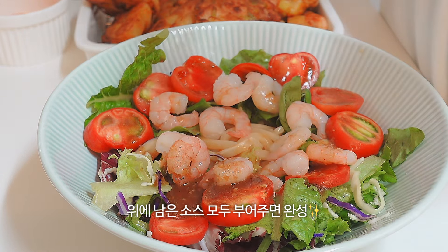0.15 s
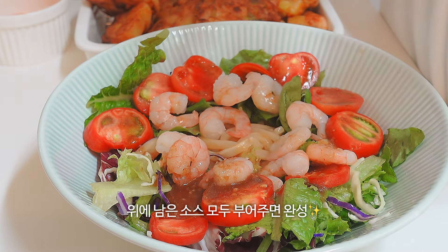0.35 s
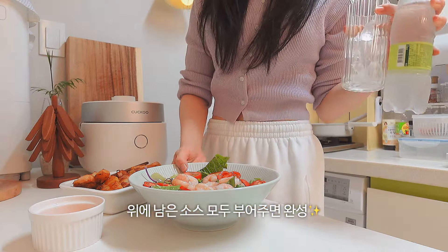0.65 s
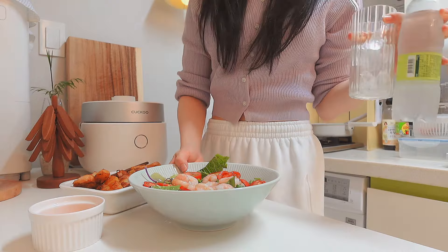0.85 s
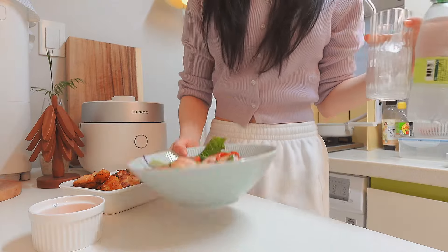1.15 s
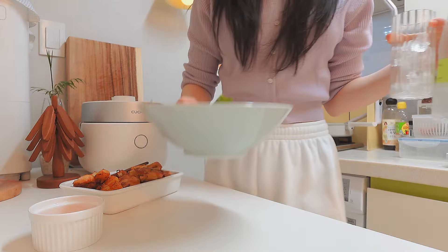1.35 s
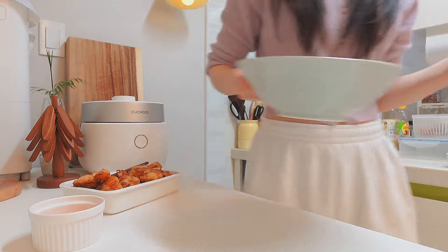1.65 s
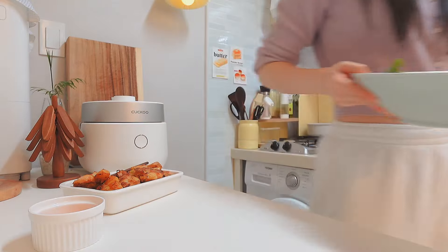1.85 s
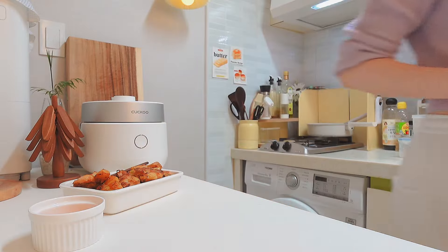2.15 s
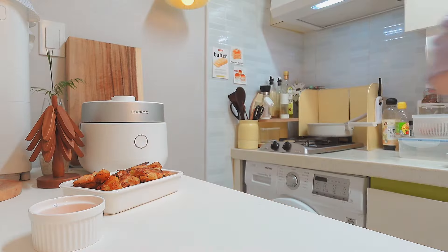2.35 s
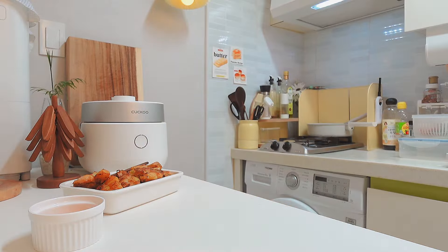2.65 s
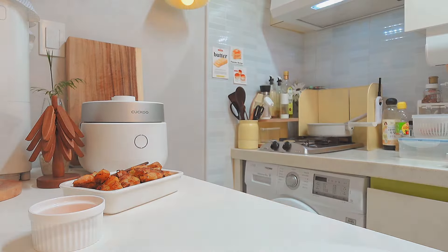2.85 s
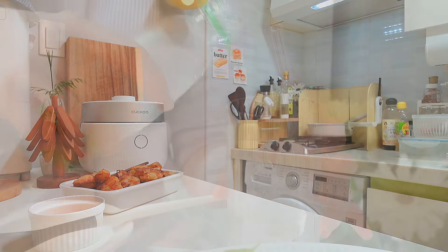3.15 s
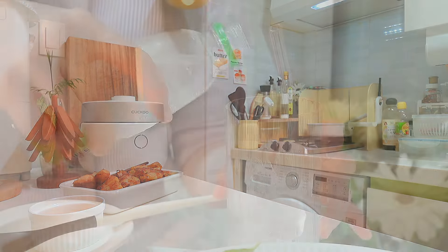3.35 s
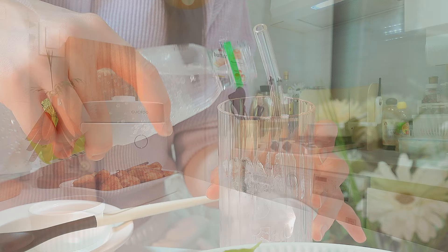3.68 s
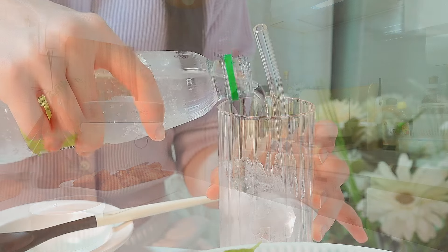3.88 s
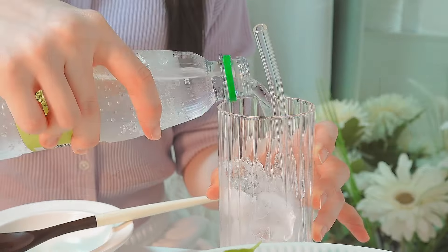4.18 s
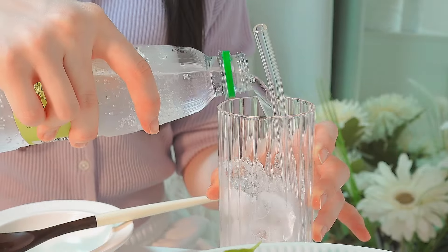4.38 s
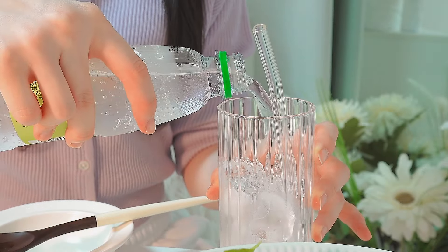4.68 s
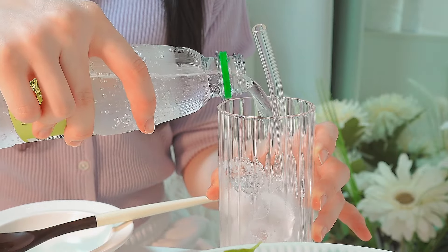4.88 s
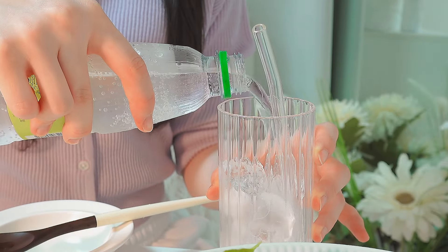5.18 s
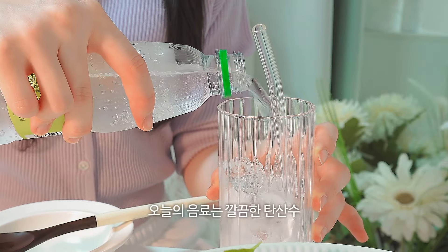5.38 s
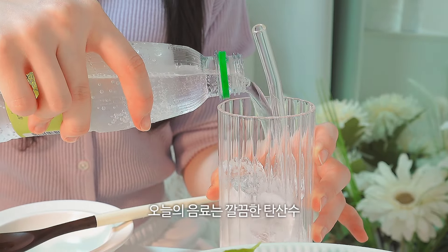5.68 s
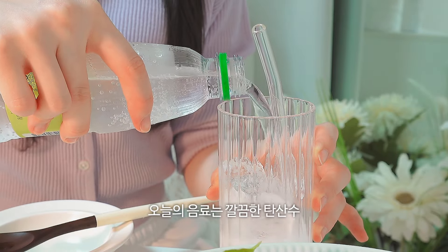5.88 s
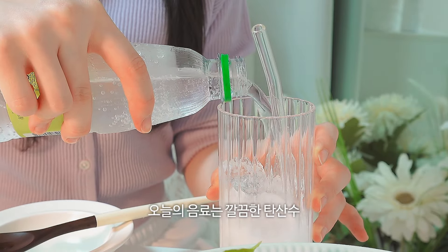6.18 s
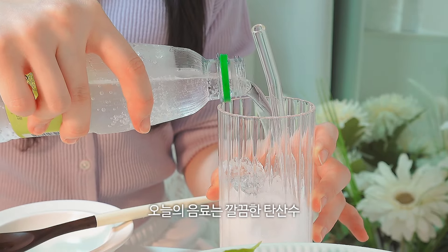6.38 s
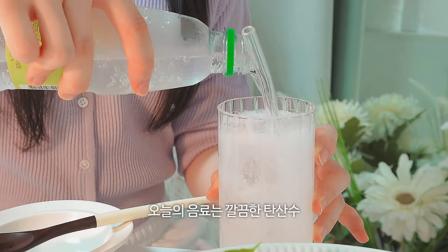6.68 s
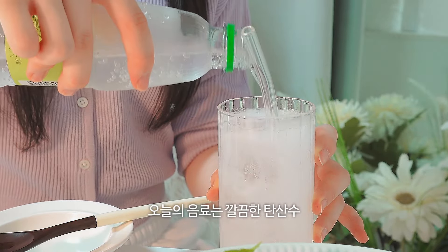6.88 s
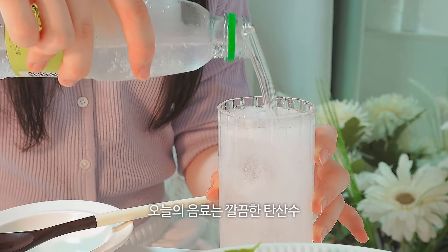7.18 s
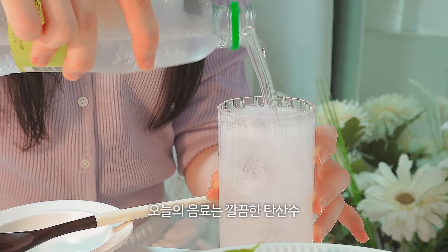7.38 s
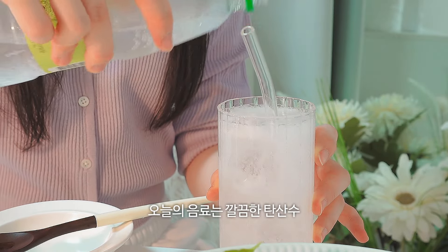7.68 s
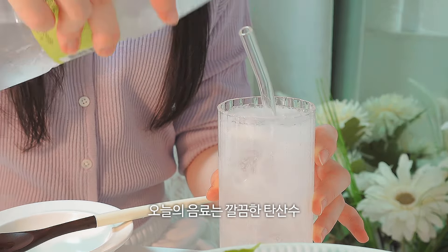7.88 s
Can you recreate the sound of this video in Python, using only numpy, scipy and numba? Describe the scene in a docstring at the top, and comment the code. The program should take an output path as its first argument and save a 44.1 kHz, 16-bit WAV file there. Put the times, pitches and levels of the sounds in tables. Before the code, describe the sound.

A ceramic bowl clinks, slippers shuffle and slap past a humming fridge with a hollow thud, then fizzy water pours over clacking ice and hisses.

```python
"""Kitchen sounds in four cuts

A spoon clinks on a ceramic bowl, a sum of decaying modes with a rattle of dishes; slippers shuffle as filtered
friction noise by a humming fridge, and something is put down with a thud that rings a hollow body. Fizzy water
is then poured: bubble noise, air resonances, glugs and ice clacking as short rings. Last, the full glass hisses.
Thin high blips, microphone hiss and mains hum lie beneath; the image is almost mono."""
import sys
import numpy as np
from scipy import signal
from scipy.fft import rfft, irfft
from scipy.io import wavfile
from scipy.ndimage import uniform_filter1d
from numba import njit

SR = 44100
rng = np.random.default_rng(int(sys.argv[2]) if len(sys.argv) > 2 else 0)


def int16_out(signal):
    """Quantize to a 16-bit WAV file."""
    q = np.round(np.clip(np.atleast_2d(signal).T, -1, 1) * 32767)
    wavfile.write(sys.argv[1], SR, q.astype(np.int16))


N = 354123
T = np.arange(N) / SR

# Starts of the second, third and fourth scenes: t/s
CUTS = (0.458, 4.297, 6.6)
# Spectrum of the microphone hiss: f/Hz, relative level/dB
HISS = [(20, -9), (45, -13.5), (90, -3), (130, 6.5), (300, 10.5), (700, 6), (2000, 7), (8000, 13),
        (16000, 15.5)]
# Starts of the thin high blips: t/s
BLIPS = [0.35, 0.57, 1.10, 2.08, 2.52, 3.06]
# Spectrum of the fridge's broad noise: f/Hz, relative level/dB
FRIDGE = [(47, -61), (80, -52), (156, -17.5), (679, -15), (852, -18), (933, -9.5), (1380, -6.5),
          (1610, -7.5), (3000, -34), (3900, -33), (6600, -120)]
# Spoon contacts: t/s, dry peak level/dB, tilt/(dB per octave), favoured f/Hz, its lift/dB, share of free ring time
CLINKS = [(0.015, -23.5, 0.5, 2300, 5.5, 0.64), (0.205, -45.5, 19, 2560, 26.5, 0.78),
          (0.295, -33.5, -2.5, 4500, 16, 0.34), (0.324, -41.5, -0.5, 2600, 3, 0.47),
          (0.396, -48, 3, 4680, 21, 0.46), (0.764, -50.5, 8, 2100, 12, 0.45)]
# Modes of the bowl: f/Hz, relative level/dB, free t60/s
BOWL = [(891, -1.5, 0.34), (1700, -28, 0.17), (1960, -31, 0.38), (2100, 0.5, 0.14), (2296, -7, 0.16),
        (2515, 1.5, 0.13), (2620, -2, 0.21), (3000, -20, 0.21), (3380, -23, 0.1), (3760, -6.5, 0.18),
        (4060, -16, .21), (4520, 0, 0.073), (4460, -15, 0.19), (5210, -8.5, 0.15), (5340, -8, 0.08),
        (6880, -9, 0.059)]
# Spectrum of the dishes rattling around the bowl: f/Hz, relative level/dB
DISHES = [(600, -23), (1000, 0), (2000, 6), (4500, 7.5), (6000, -4.5), (8000, -33.5)]
# Slides of a sole: peak t/s, level/dB, rise/s and fall/s per 20 dB, treble relative level/dB, favoured f/Hz
SLIDES = [(0.5, -64.5, 0.13, .4, -15, 1700), (0.65, -61.5, 0.36, 0.3, 3, 2400),
          (0.79, -64.5, 0.13, 0.34, -15, 2000), (1.09, -62, 0.31, 0.49, 10, 3470),
          (1.41, -52.5, 0.036, 0.46, 3.5, 2460), (1.53, -52.5, 0.24, 0.17, 3.5, 1700),
          (1.73, -56.5, 0.074, 0.17, 10.5, 4200), (1.95, -60, 0.33, 0.29, 8, 4020),
          (2.19, -55, 0.049, 0.28, 4.5, 1730), (2.33, -58.5, 0.22, 0.39, 10, 4230),
          (2.43, -52.5, .04, 1, 1, 3740), (2.7, -54.5, 0.56, .6, -1.5, 2980),
          (2.836, -36, 0.033, 0.26, -12, 2650), (3.03, -44.5, 0.52, 0.27, 2.5, 2530),
          (3.271, -45.5, 0.013, 0.4, -2, 1830), (3.55, -46.5, 0.38, 0.15, 3.5, 2760),
          (3.811, -37.5, 0.026, 0.19, -6, 1880), (3.95, -45.5, 0.5, 0.29, 2.5, 2400),
          (4.12, -46.5, 0.27, 0.27, 1, 2380), (4.268, -43, .04, .5, -4, 1310)]
# Spectrum of sole friction: f/Hz, relative level/dB
SOLE = [(290, -14.5), (500, -13.5), (545, -35), (665, -17.5), (734, -24.5), (1050, -5), (1260, -8.5),
        (1880, -1), (2200, -3), (4540, -2), (7790, -7), (11800, -15.5), (15000, -18.5)]
# Resonances of floor and room: f/Hz, width/Hz, lift/dB
SOLE_PEAKS = [(1140, 59, 3.5), (1640, 210, 3.5), (2560, 78, 3), (4180, 320, 1.5), (6040, 83, 0.5)]
# Slipper slaps and knocks: t/s, dry peak level/dB, centre f/Hz, push on the hollow body/dB
SLAPS = [(1.2054, -50.5, 4900, -111), (1.722, -38.5, 4390, -114), (2.149, -61, 1800, -99.5),
         (2.4211, -36, 3760, -89.5), (2.799, -27.5, 2620, -56), (2.82, -28.5, 4510, -76),
         (2.833, -33.5, 3800, -78), (2.9, -50, 2500, -74.5), (2.969, -52, 2500, -85),
         (3.265, -31.5, 1900, -102), (3.8072, -33, 1900, -91), (4.0168, -35.5, 3560, -99.5),
         (4.2639, -34, 1230, -78.5)]
# Modes of the hollow body: f/Hz, relative level/dB, t60/s
HOLLOW = [(158, -29, 0.32), (280, -27, 0.34), (294.7, -7.5, 0.31), (395, -10.5, 0.25), (482, 0, 0.12),
          (501.2, -5, 0.43), (556, 3, 0.04), (626, -9.5, 0.18), (810, -10, 0.096), (969, -10.5, 0.17),
          (1230, -12, 0.21)]
# Rumbles of the hollow body as it slides: peak t/s, level/dB, rise/s and fall/s per 20 dB
DRAG = [(3.545, -58, 0.058, 0.052), (3.6, -50.5, 0.043, 0.089)]
# Course of the fizz while pouring: t/s, level/dB
POUR = [(4.3, -74), (4.37, -53), (4.43, -65), (4.5, -51), (4.62, -58), (4.75, -52), (4.9, -46.5),
        (5.06, -49), (5.14, -51), (5.3, -48), (5.6, -49), (6.6, -48)]
# Spectrum of that fizz: f/Hz, relative level/dB
EARLY_FIZZ = [(500, -48), (1200, -15.5), (1900, -32), (2300, -31), (2800, -23.5), (3200, -1.5), (3600, 2.5),
              (4200, -3), (4700, 0.5), (5300, -3.5), (7500, -7), (10000, -12.5), (15500, -16)]
# Swells of a lower fizz band as foam rises: peak t/s, level/dB, rise/s and fall/s per 20 dB
FOAM = [(4.47, -52, 0.015, .11), (4.81, -76, .02, 0.59), (5.3, -70.5, .05, 1.2), (5.47, -82, .05, 0.37),
        (6.21, -55.5, 0.55, 0.93)]
# Air column rung by the stream: t/s, level/dB, f/Hz
AIR_COLUMN = [(4.4, -82, 1570), (4.8, -67, 1580), (5.3, -63, 1656), (6.05, -63.5, 1900), (6.2, -70, 1760),
              (6.45, -82, 1640)]
# Splashes that ring the column harder: peak t/s, level/dB, fall/s per 20 dB, f/Hz
SPLASHES = [(4.37, -67, .04, 1590), (4.46, -51, 0.14, 1580), (4.499, -41.5, 0.048, 1620),
            (4.656, -57.5, .06, 1500), (4.744, -52, 0.023, 1576), (4.82, -52.5, 0.076, 1600),
            (4.88, -48, 0.041, 1590), (4.925, -54.5, 0.12, 1600), (5.05, -46, 0.044, 1620),
            (5.305, -51.5, 0.11, 1600), (5.465, -50.5, 0.068, 1770), (5.495, -50, 0.075, 1700),
            (5.799, -51, 0.046, 1780), (5.957, -49.5, 0.054, 1700), (6.068, -52, 0.047, 1830),
            (6.222, -60, .08, 1600), (6.339, -52, 0.034, 1570)]
# Glugs: peak t/s, level/dB, rise/s and fall/s per 20 dB
GLUGS = [(4.498, -63, 0.04, 0.039), (4.59, -72, .08, .08), (4.66, -72, 0.073, 0.21),
         (4.825, -70, 0.031, 0.11), (5.04, -76.5, .3, 0.087), (5.315, -66, .08, 0.04),
         (5.39, -67, .08, 0.055), (5.499, -52.5, .04, 0.064), (6.07, -66.5, 0.21, 0.072),
         (6.146, -65, 0.086, .1), (6.28, -54, 0.12, 0.28), (6.375, -65, .08, 0.092), (6.59, -63, 0.14, .2)]
# Small splashes on the ice: t/s, level/dB
CRACKLE = [(4.34, -68), (4.5, -68), (4.7, -70), (4.9, -59), (5.1, -60.5), (5.5, -52), (5.7, -84)]
# Ice on ice or glass: t/s, level/dB, ring f/Hz, ring t60/s, treble tick relative level/dB
CLACKS = [(4.351, -42.5, 7260, 0.012, 7.5), (4.3587, -42, 8500, 0.012, 2), (4.37, -42, 3380, 0.023, -12),
          (4.392, -51, 4820, 0.03, -12), (4.4154, -40.5, 4500, 0.026, -6), (4.421, -45, 11200, 0.008, -20),
          (4.4423, -21, 3560, 0.037, -40), (4.449, -42, 7760, 0.02, -30), (4.4658, -24, 3360, 0.022, -28),
          (4.475, -31, 3540, 0.028, -10), (4.4934, -23.5, 4360, 0.02, -17), (4.499, -29, 10100, 0.01, -20),
          (4.5021, -29, 1628, 0.028, -14), (4.553, -35, 4800, 0.015, -24), (4.569, -40, 1740, 0.0082, -14),
          (4.6189, -47, 3720, 0.017, -15), (4.6423, -42.5, 3470, 0.02, -3),
          (4.691, -42.5, 3820, 0.023, -21), (4.7361, -35.5, 3600, 0.02, -22),
          (4.7706, -45, 3600, 0.028, -16), (4.8118, -26.5, 4220, 0.012, -10),
          (4.8265, -27.5, 3480, 0.017, -20), (4.853, -23, 6070, 0.02, -23),
          (4.859, -30.5, 5870, 0.018, -24), (4.8728, -25, 3450, 0.024, -22),
          (4.8808, -44, 3250, 0.029, -18), (4.9198, -37, 1604, 0.033, 6.5), (4.9287, -37, 3660, 0.025, -20),
          (4.952, -24, 5510, 0.016, -27), (4.9585, -33, 5650, 0.027, -16), (4.975, -33, 5530, 0.024, -20),
          (5.005, -36.5, 5230, 0.03, -19), (5.0105, -33, 5700, 0.01, -23), (5.037, -33, 4600, 0.02, -20),
          (5.0415, -35, 4400, 0.015, -20), (5.049, -29, 3840, 0.03, -4), (5.07, -47, 3120, 0.03, -15),
          (5.1587, -56, 3770, 0.03, -14), (5.2128, -44.5, 3650, 0.026, 12), (5.2195, -36, 9450, 0.013, 3),
          (5.2744, -35, 3740, 0.027, -20), (5.2998, -36, 1510, 0.011, -23), (5.362, -35, 4400, 0.027, -24),
          (5.3885, -44, 4420, 0.019, -20), (5.43, -51, 3860, 0.022, -4), (5.4687, -20, 3470, 0.012, -8),
          (5.487, -30.5, 1580, 0.024, -19), (5.488, -27.5, 4050, 0.015, -15), (5.501, -38, 1710, 0.036, -6),
          (5.727, -34.5, 3980, 0.042, -23), (6.216, -35.5, 3720, 0.032, -22),
          (6.3329, -35.5, 3740, 0.03, -27)]
# Spectrum of the crack of ice: f/Hz, relative level/dB
ICE = [(600, -35), (1500, -17), (2400, -22.5), (3200, 6.5), (3600, 7), (4400, 3), (6000, -8), (8000, -10.5),
       (12000, -25), (16000, -81)]
# Spectrum of the full glass: f/Hz, relative level/dB
FULL_FIZZ = [(410, -76), (700, -39), (737, -54), (943, -26), (1240, -17), (1450, -22.5), (1580, -10),
             (2080, -16), (2460, -2), (2730, -8), (3580, 1.5), (3970, -4), (4580, -2.5), (8210, -9.5),
             (15500, -17.5)]
# Humps upon that spectrum: f/Hz, width/Hz, lift/dB
FULL_PEAKS = [(1250, 150, 0), (1620, 48, 9), (2450, 170, 2.5), (3470, 1300, 2.5), (4620, 280, 1.5)]
# Spectral weighting of the side signal: f/Hz, gain/dB
SIDE = [(60, -28), (250, -44), (1000, -44), (4000, -21), (12000, -103)]

HISS_DB = -62.5
MAINS_HZ, MAINS_DB = 60, -90.5
BLIP_HZ, BLIP_S, BLIP_DB = 11280, .1, -75
FRIDGE_DB = -72.5
HUM_HZ, HUM_DB, MURMUR_HZ, MURMUR_DB = 156.1, -78.5, 319, -78.5
SPLASH_RISE_S = 0.023  # per 20 dB
GLUG_HZ, GLUG_CLIMB_HZ_PER_S = 506, 283  # pitch at the start of the pour, and its climb
FULL_DB, FULL_GROWS_DB_PER_S = -48, 1.2
BALANCE_DB = -.2  # left minus right
TOP_HZ = 15800


def undb(db):
    """Amplitude ratio of a level: 20 dB per factor of ten."""
    return 10 ** (np.asarray(db) / 20)


def unit(x):
    """Normalisation to an rms of 1."""
    return x / np.sqrt(np.mean(x ** 2))


def peak_unit(x):
    """Normalisation to a peak of 1."""
    return x / np.abs(x).max()


def noise():
    """White Gaussian noise: equal power at every frequency."""
    return rng.standard_normal(N)


def colour(x, points, peaks=()):
    """Minimum-phase filtering: the folded cepstrum of the (Hz, dB) curve and its humps gives a causal response."""
    hz = np.arange(1, 4098) * SR / 8194
    point_hz, point_db = np.array(points).T
    db = np.interp(np.log(hz), np.log(point_hz), point_db)
    for centre, width, lift_db in peaks:
        db = db + lift_db / (1 + (2 * (hz - centre) / width) ** 2)
    cepstrum = irfft(db * np.log(10) / 20)
    cepstrum[1:4096] *= 2
    cepstrum[4097:] = 0
    response = irfft(np.exp(rfft(cepstrum)))
    return signal.fftconvolve(x, response)[:N]


@njit
def svf(x, hz, width):
    """State-variable resonance: two integrators form a band-pass whose centre may move."""
    y, band, low = np.empty(len(x)), 0., 0.
    for i in range(len(x)):
        g, damping = np.tan(np.pi * hz[i] / SR), width / hz[i]
        v = (band + g * (x[i] - low)) / (1 + g * (g + damping))
        band, low = 2 * v - band, low + 2 * g * v
        y[i] = damping * v
    return y


def double_svf(x, hz, width):
    """Cascaded resonance: two equal band-passes steepen the skirts."""
    return svf(svf(x, hz, width), hz, width)


def lowcut(x, hz):
    """Fourth-order Butterworth high-pass: maximally flat above its corner."""
    return signal.sosfilt(signal.butter(4, hz, "high", fs=SR, output="sos"), x)


def ring(x, modes):
    """Modal superposition: x excites decaying (Hz, dB, t60) resonances."""
    out = 0
    for hz, db, t60 in modes:
        pole = np.exp(2j * np.pi * hz / SR - np.log(1000) / (t60 * SR))
        out = out + undb(db) * signal.lfilter([1], [1, -pole], x).imag
    return out


def add(out, s, burst):
    """Linear superposition: mixes a burst in at time s."""
    i = int(s * SR)
    out[i:i + len(burst)] += burst[:N - i]


def curves(table, off=-120.):
    """Linear interpolation of table columns in time; the first takes the value off outside the table."""
    s, first, *rest = np.transpose(table)
    return [np.interp(T, s, first, off, off)] + [np.interp(T, s, c) for c in rest]


def swells(s, db, rise_s, fall_s, *columns):
    """Power addition of swells (dB) rising and falling 20 dB in the given times; columns average by power."""
    t = T[::32, None]  # a coarse time grid suffices
    late = t - s
    drop_db = 20 * np.maximum(-late / rise_s, late / fall_s)
    power = undb(2 * np.maximum(db - drop_db, -200))
    total = power.sum(axis=1)
    results = [10 * np.log10(total)] + [power @ c / total for c in columns]
    return [np.interp(T, t[:, 0], c) for c in results]


def walk(rate):
    """Slewed random modulation: rate draws a second, smoothed over one step."""
    k = int(SR / rate)
    return uniform_filter1d(np.repeat(rng.standard_normal(N // k + 1), k), k)[:N]


def pops(rate, spread_db):
    """Random impulse train: clicks at a mean rate per second, many small and few large."""
    size = undb(spread_db * np.minimum(rng.exponential(1, N), 3))
    return unit((rng.random(N) < rate / SR) * noise() * size)


def pings(rate, cycles):
    """Bubble resonance: random pops ring at one of fifteen pitches, losing 60 dB in the given cycles."""
    pitches = 1500 * 2 ** np.arange(0, 3, .2)
    return unit(sum(ring(pops(rate, 4.0), [(hz, 0, cycles / hz)]) for hz in pitches))


def bubbles(shape, peaks=()):
    """Superposed bubble bursts: countless tiny ones blend into noise and a few larger ones stand out."""
    bursts = noise() + 0.66 * pops(3000, 2.2) + .18 * pings(14, 81)
    return undb(0.37 * walk(13)) * unit(colour(bursts, shape, peaks))


def air(db, hz, width):
    """Cavity resonance: splashing water rings a pocket of air."""
    splash = (noise() + 0.68 * pops(200, 4.6)) * undb(0.35 * walk(40))
    return undb(db) * unit(double_svf(splash, hz, width))


def room(x, t60, wet_db):
    """Exponential reverberation: adds a tail of decaying noise."""
    t = T[:SR // 2]
    tail = rng.standard_normal(len(t)) * undb(-60 * t / t60) * (t > .002)
    return x + undb(wet_db) * signal.fftconvolve(x, tail / np.linalg.norm(tail))[:N]


def microphone_hiss():
    """Stationary noise: white noise takes the spectrum of the microphone."""
    return undb(HISS_DB) * unit(colour(noise(), HISS))


def mains_hum():
    """Pure tone: a steady sinusoid at the mains frequency."""
    return undb(MAINS_DB) * np.sin(2 * np.pi * MAINS_HZ * T)


def blips():
    """Gated tone: a thin high sinusoid sounds briefly, its edges smoothed against clicks."""
    on = sum((T > s) & (T < s + BLIP_S) for s in BLIPS)
    return undb(BLIP_DB) * uniform_filter1d(1. * on, size=400) * np.sin(2 * np.pi * BLIP_HZ * T)


def fridge():
    """Tone and noise: broad noise, a hum of wavering level and a narrow-band murmur about an octave above."""
    hum = undb(HUM_DB + 2.9 * walk(4.77)) * np.sin(2 * np.pi * HUM_HZ * T)
    murmur = undb(MURMUR_DB) * unit(svf(noise(), MURMUR_HZ + 0 * T, 54.0))
    return hum + murmur + undb(FRIDGE_DB) * unit(colour(noise(), FRIDGE))


def shuffle():
    """Sliding friction: gritty noise of the soles, with treble and favoured pitch set by each slide."""
    db, treble_db, scuff_hz = swells(*np.transpose(SLIDES))
    body, edge = (unit(colour(noise() + 0.56 * pops(2000, 3.5), SOLE, SOLE_PEAKS)) for _ in range(2))
    scuff = unit(svf(noise(), scuff_hz, 380.0))
    dull = colour(body, [(2500, -2.0), (8000, -8.0)])
    treble = colour(edge, [(1500, -13.0), (5000, -4.5)])
    friction = dull + undb(treble_db) * treble + 0.26 * scuff
    return lowcut(undb(db + 1.1 * walk(30)) * friction, 240)


def slaps_and_thud():
    """Impact excitation: slaps are band-passed bursts, and each pushes the modes of a hollow body."""
    slap, knock, t = np.zeros(N), np.zeros(N), T[:SR // 8]
    for s, peak_db, hz, push_db in SLAPS:
        burst = svf(rng.standard_normal(len(t)) * np.exp(-t / 0.017), hz + 0 * t, 0.5 * hz)
        add(slap, s, undb(peak_db) * peak_unit(burst))
        add(knock, s, undb(push_db) * np.hanning(24))
    thud = lowcut(ring(knock, HOLLOW) * undb(2.0 * walk(38)), 134)
    return room(lowcut(slap, 300), 0.17, -1.2) + room(thud, 0.58, -3.5)


def drag():
    """Friction-driven resonance: the hollow body rumbles as it slides."""
    level_db = swells(*np.transpose(DRAG))[0] + 4.0 * walk(40)
    return undb(level_db) * unit(double_svf(noise(), 490 + 0 * T, 70.0))


def bowl():
    """Modal excitation: each touch weights and damps the bowl's modes; nearby dishes rattle along."""
    out, t = np.zeros(N), T[:SR // 2]
    for s, db, tilt, favoured_hz, lift_db, free in CLINKS:
        # the spoon chatters on after contact
        touch = (t == 0) + .012 * rng.standard_normal(len(t)) * np.exp(-t / .04)
        modes = []
        for hz, mode_db, t60 in BOWL:
            lift = lift_db / (1 + ((hz - favoured_hz) / 200) ** 2)
            modes.append((hz, mode_db + tilt * np.log2(hz / 2500) + lift, free * t60))
        decay = np.exp(-t / (0.12 * free)) + 4.9 * np.exp(-t / 0.0056)
        rattle = colour(rng.standard_normal(len(t)) * decay, DISHES)[:len(t)]
        clink = lowcut(ring(touch, modes), 700) + .33 * rattle
        add(out, s, undb(db) * peak_unit(clink))
    return room(out, .2, -14)


def pouring_fizz():
    """Bubble noise: bursts follow the pour, and a lower band swells as foam rises."""
    fizz = undb(curves(POUR)[0]) * bubbles(EARLY_FIZZ)
    foam = unit(double_svf(noise(), 2500 + 0 * T, 540.0))
    return fizz + undb(swells(*np.transpose(FOAM))[0]) * foam


def stream():
    """Air-column resonance: the stream rings the air in glass and bottle; glugs climb as the glass fills."""
    s, db, fall_s, hz = np.transpose(SPLASHES)
    column = air(*curves(AIR_COLUMN), 220.0)
    splashes = air(*swells(s, db, SPLASH_RISE_S, fall_s, hz), 195.0)
    glug_hz = np.maximum(GLUG_HZ + GLUG_CLIMB_HZ_PER_S * (T - CUTS[1]), GLUG_HZ)
    glugs = air(swells(*np.transpose(GLUGS))[0], glug_hz, 150.0)
    return column + splashes + glugs


def ice():
    """Impact and resonance: each clack joins a noisy crack, a ringing cube and a treble tick."""
    out = undb(curves(CRACKLE)[0]) * unit(colour(pings(8, 25), EARLY_FIZZ))
    t = T[:SR // 8]
    for s, db, hz, t60, tick_db in CLACKS:
        touch = ((t == 0) + 0.27 * rng.standard_normal(len(t))) * undb(-60 * t / 0.012)
        crack = colour(touch, ICE)[:len(t)]
        # each cube rings briefly on a close pair of its own
        pair = ring(touch, [(hz, 0, t60), (1.07 * hz, -4.0, t60)])
        cube = svf(pair, hz + 0 * t, 0.44 * hz)
        clack = 0.94 * peak_unit(crack) + peak_unit(cube)
        tick = svf(lowcut(touch, 5100), 10500 + 0 * t, 6800.0)
        add(out, s, undb(db) * (peak_unit(clack) + undb(tick_db) * peak_unit(tick)))
    return room(out, 0.18, -5)


def full_glass():
    """Bubble noise with resonant humps: the hiss of the full glass grows steadily."""
    level_db = FULL_DB + FULL_GROWS_DB_PER_S * (T - CUTS[2])
    return undb(level_db) * bubbles(FULL_FIZZ, FULL_PEAKS)


def scene():
    """Superposition and mid-side stereo: gated scenes share one bed, and a smeared copy forms the side."""
    shot = np.searchsorted(CUTS, T)
    mid = microphone_hiss() + mains_hum() + blips() + bowl()
    mid += (shot == 1) * (fridge() + shuffle() + slaps_and_thud() + drag())
    mid += (shot == 2) * (pouring_fizz() + stream() + ice())
    mid += (shot == 3) * full_glass()
    side = colour(room(mid, 0.011, 6.1) / 10, SIDE)
    return np.array([(mid + side) * undb(BALANCE_DB / 2), (mid - side) * undb(-BALANCE_DB / 2)])


def record(dry):
    """Band limitation: a steep elliptic low-pass removes the top treble."""
    return signal.sosfilt(signal.ellip(10, .2, 60, TOP_HZ, fs=SR, output="sos"), dry)


dry = scene()
out = record(dry)
int16_out(out)
```